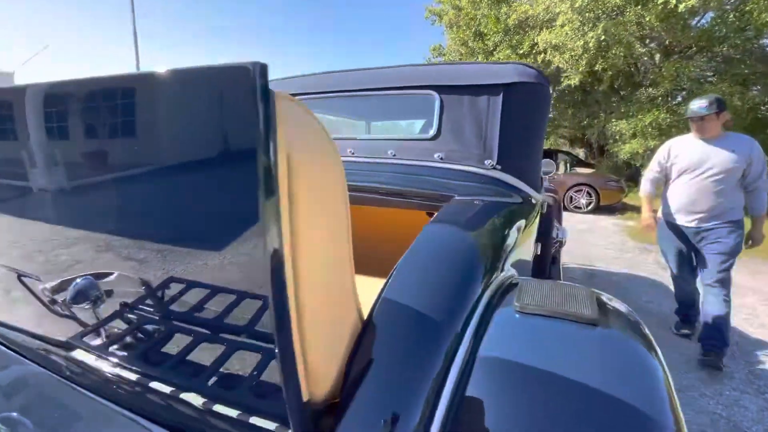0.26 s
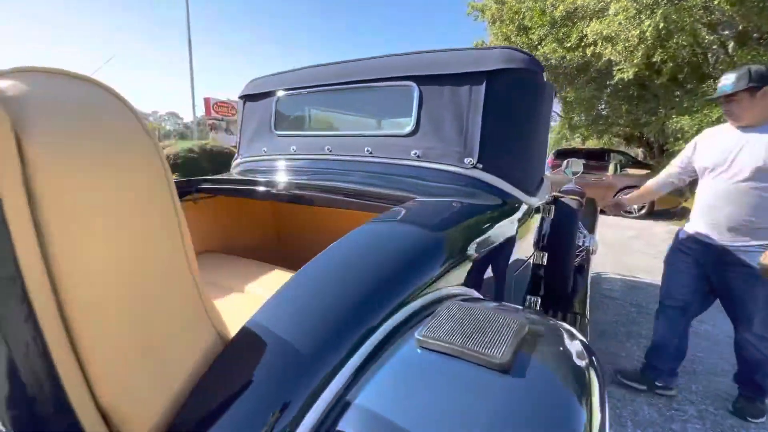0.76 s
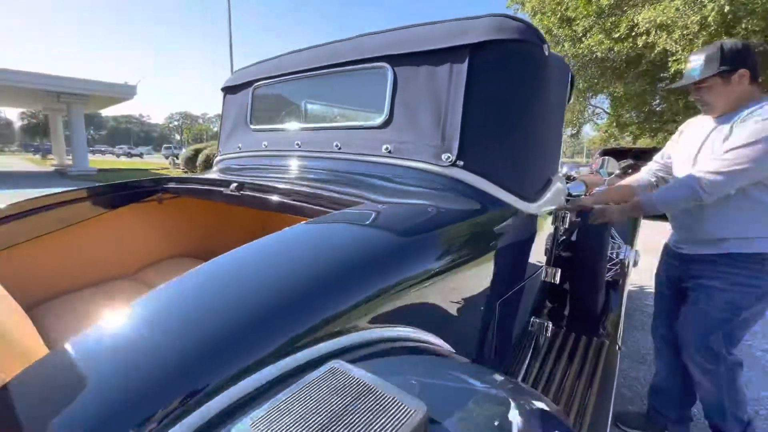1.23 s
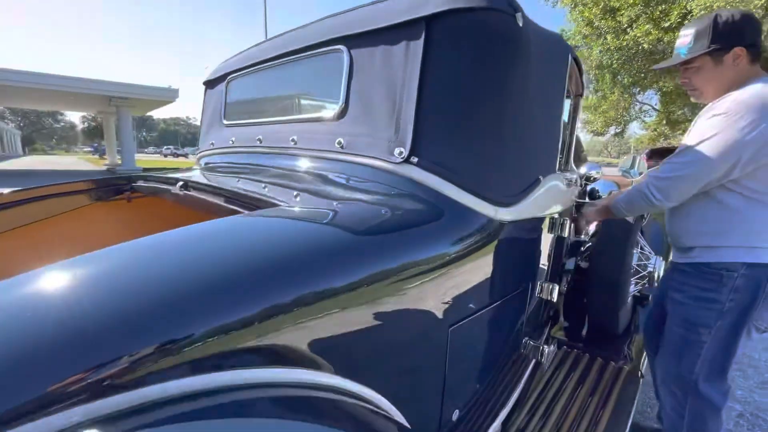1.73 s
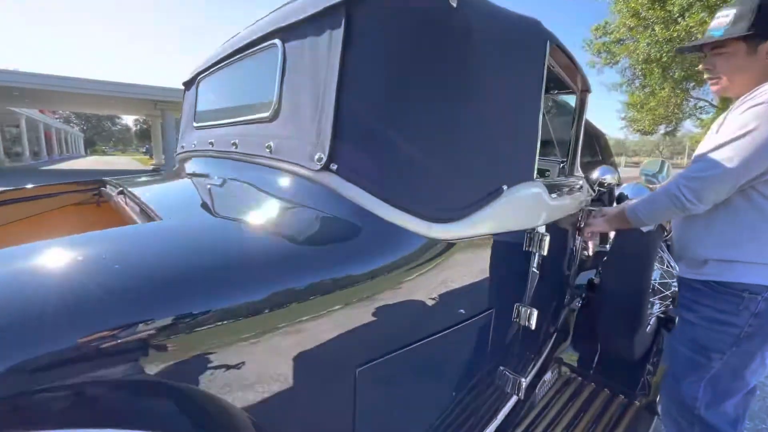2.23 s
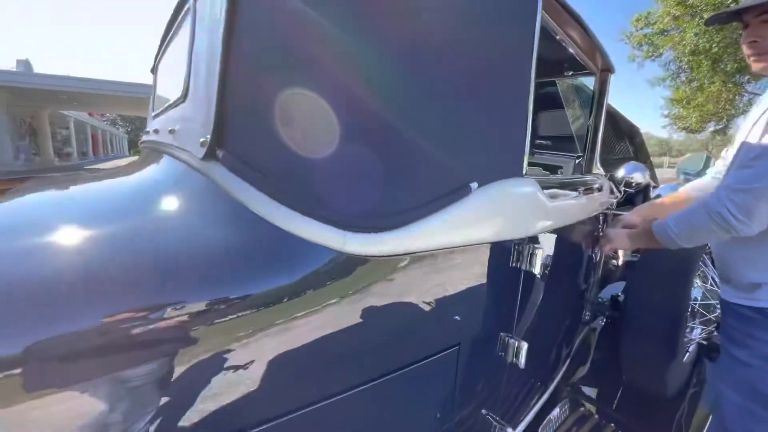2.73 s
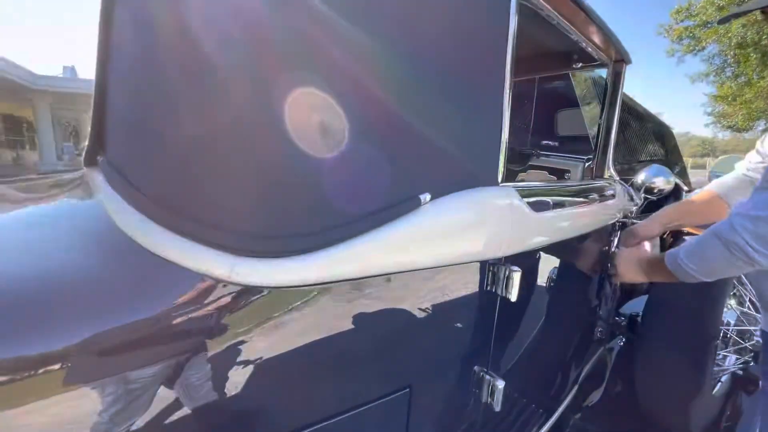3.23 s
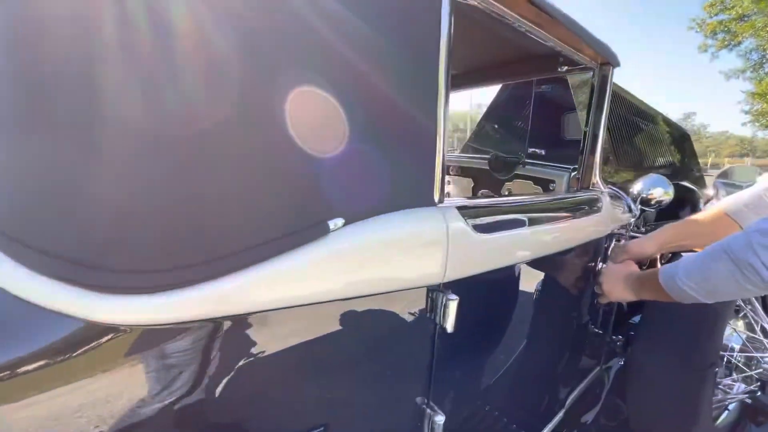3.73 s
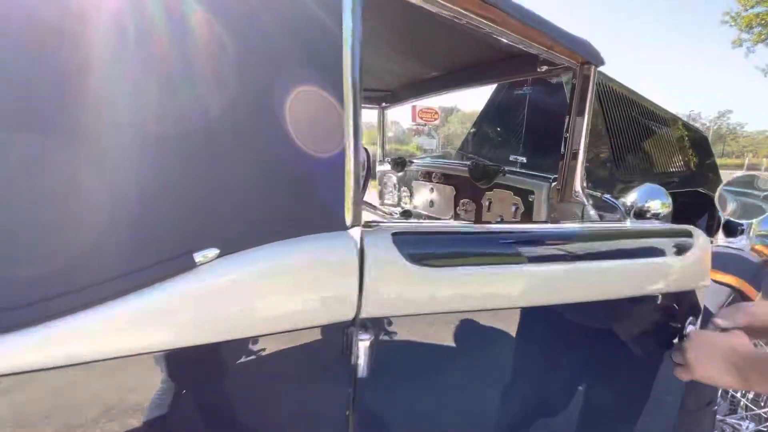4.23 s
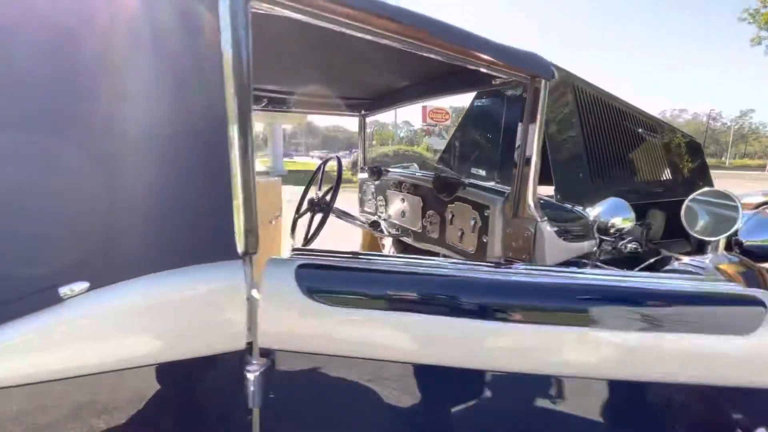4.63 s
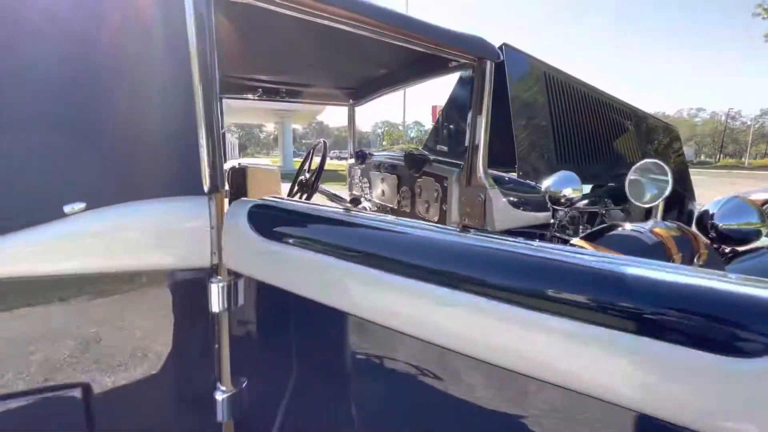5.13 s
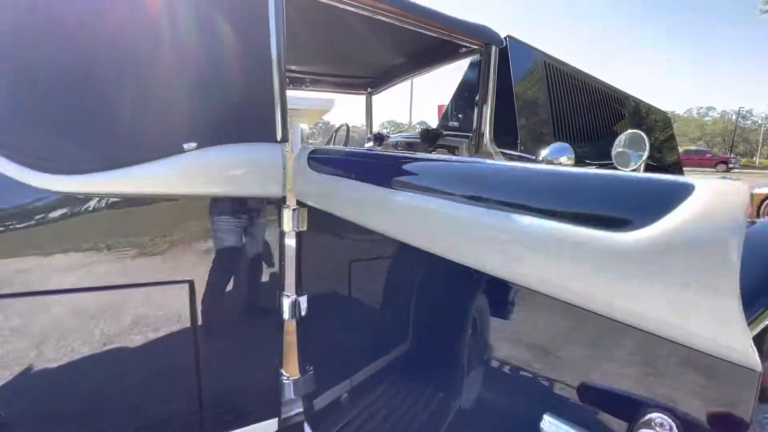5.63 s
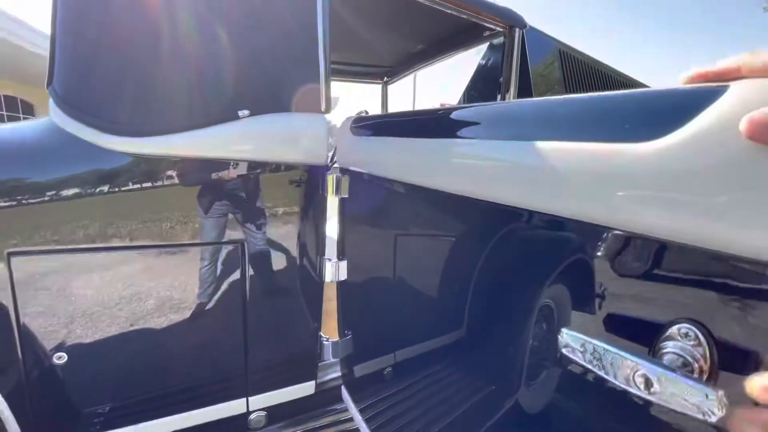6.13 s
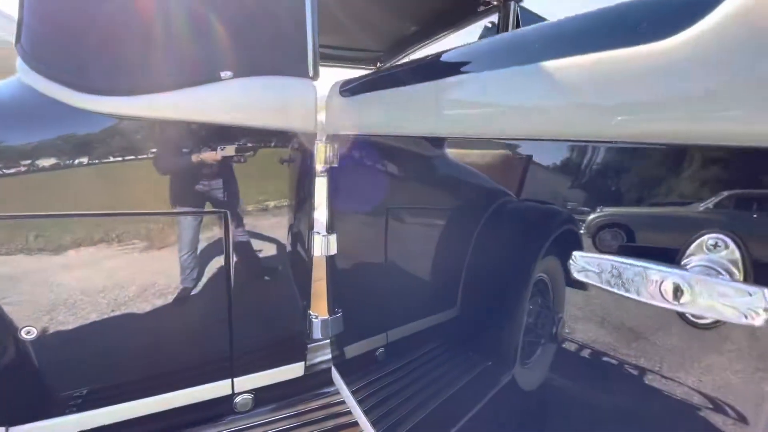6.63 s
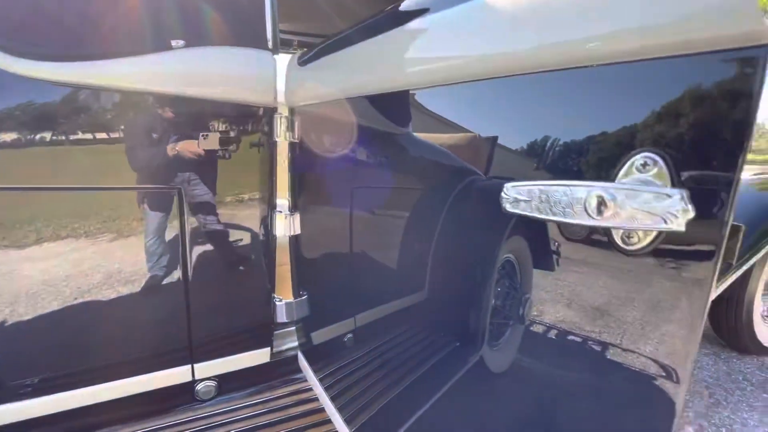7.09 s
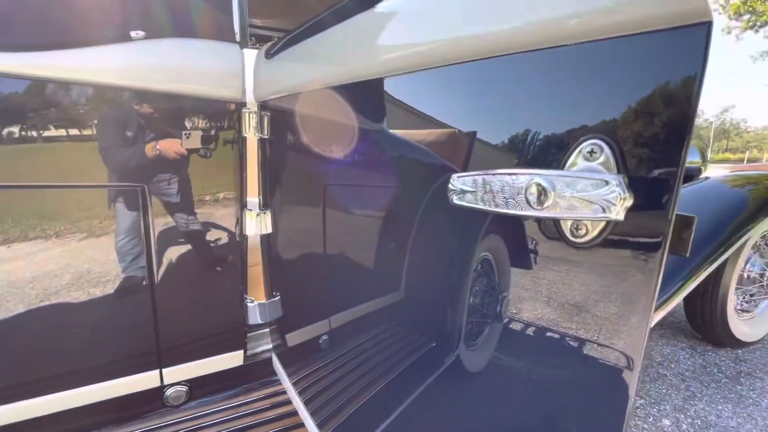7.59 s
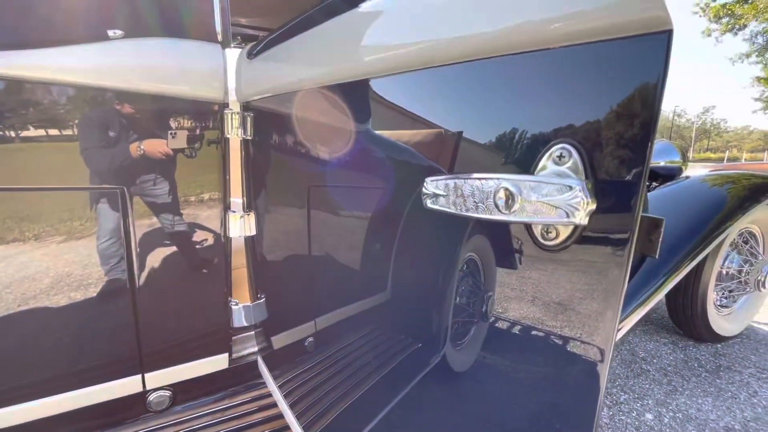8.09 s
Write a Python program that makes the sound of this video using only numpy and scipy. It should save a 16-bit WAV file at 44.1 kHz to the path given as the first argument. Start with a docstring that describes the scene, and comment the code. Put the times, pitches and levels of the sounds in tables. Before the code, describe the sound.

Low engine drones and a soft road rumble sit to the right throughout, swelling and easing. Close to the microphone, slightly left, shoes crunch and scuff on grit. At about three seconds a metal handle clacks sharply, then a cluster of latch snaps and a dull door thud. Later come a few crisp clicks, faint shuffling, and a climbing engine tone under broadening traffic roar.

```python
"""Outdoors on a gravel lot: engines drone and pull away nearby over a wash of road noise.
Each engine is a stack of sine tones tied to its speed; the road is shaped noise that swells and fades.
Close by, shoes crunch and scuff on grit (noise bursts and grains), a door handle ticks, its latch snaps
and the door thuds free (short blows ringing metal modes).
Two spaced microphone ports hear the engines from the right."""
import sys
import numpy as np
from scipy import signal
from scipy.fft import rfft, irfft
from scipy.io import wavfile

SR = 44100
rng = np.random.default_rng(int(sys.argv[2]) if len(sys.argv) > 2 else 0)


def store_wav(level_fs):
    """Save 16-bit WAV to argv[1]."""
    pcm = np.round(np.clip(np.atleast_2d(level_fs), -1, 1) * 32767)
    wavfile.write(sys.argv[1], SR, pcm.T.astype(np.int16))


N = 368235  # length in samples

# tones of the near engine over time: t/s, level of cycle order 4/dB, level of the firing order 8/dB
NEAR_TONES = [(.6, -52.5, -55), (.85, -31.5, -50), (1.65, -26, -45), (2.1, -30.5, -43), (3.3, -32, -41),
              (3.8, -57, -42), (5.05, -58, -42), (5.35, -58, -33), (6.8, -56, -29), (8.35, -55, -31)]
PORT_LAG_S = 0.00039  # the left port hears the engines and road this much later
CRACK_S = 0.0033  # time constant of the sharp start of a crunch or clack


def amp(db):
    """Turn decibels into a gain."""
    return 10 ** (np.asarray(db) / 20)


def rms_one(x):
    """Scale to unit rms."""
    return x / np.sqrt(np.mean(x ** 2) + 1e-20)


def in_time(rows):
    """Draw straight lines between the rows of a curve, giving each column sample by sample."""
    s, *columns = np.transpose(rows)
    t = np.arange(N) / SR
    return [np.interp(t, s, column) for column in columns]


def at_hz(points, hz):
    """Read a spectrum between its points on a log-frequency axis."""
    points = np.array(points)
    return np.interp(np.log(hz), np.log(points[:, 0]), points[:, 1])


def drift(rate_hz):
    """Slow random wandering of unit rms, made at a fortieth of the sample rate; higher rates wander faster."""
    r = np.exp(-80 * np.pi * rate_hz / SR)
    white = rng.standard_normal(N // 40 + 2002)
    slow = signal.lfilter([1], [1, -2 * r, r * r], white)[2000:]  # drop the filter's start
    return np.interp(np.arange(N) / 40, np.arange(len(slow)), rms_one(slow))


def coloured(x, spectrum):
    """Shape a signal by a spectrum, then scale to unit rms."""
    hz = np.maximum(np.arange(N // 2 + 1) * SR / N, 1)
    return rms_one(irfft(rfft(x) * amp(at_hz(spectrum, hz)), N))


def band(x, low_hz, high_hz):
    """Keep the range between two frequencies."""
    return signal.sosfilt(signal.butter(2, [low_hz, high_hz], "band", fs=SR, output="sos"), x)


def ports(x, lag_s):
    """Send one source to both ports, later on the left."""
    n = np.arange(N)
    left = np.interp(n - lag_s * SR, n, x)
    return np.array([left, x])


def engine(hz, lines, span, start_turn):
    """Exhaust tones (order, level over time) as sines locked to the speed, heard over the span of a curve."""
    turns, t = np.cumsum(hz) / SR + start_turn, np.arange(N) / SR
    start_s, end_s = span[0][0], span[-1][0]
    heard = np.interp(t, [start_s - .1, start_s, end_s, end_s + .2], [0, 1, 1, 0])
    tones = sum(np.sqrt(2) * amp(db) * np.sin(2 * np.pi * k * turns) for k, db in lines)
    return heard * tones


def near_engine(waver_db=1.0):
    """Eight-cylinder engine under load: two strong orders waver and stumble, minor orders swell slowly."""
    # engine speed: t/s, speed in cycles per second f/Hz
    speed = [(.6, 15.85), (1.6, 15.05), (2.4, 15.05), (3.3, 15.9), (4.5, 16.05), (8.35, 17.03)]
    # tones from uneven cylinders: cycle order, level against the shared minor level/dB
    minor_orders = [(3, -2), (6, 4), (11, -5.5), (13, -2)]
    # moments when the firing falters: t/s, change of order 4 level/dB, change of order 8 level/dB
    stumbles = [(6.5, 12, -10), (7.25, -5, -29)]
    stumble_s = 0.22  # to reach the full change, and again to recover
    minor_from_db, minor_full_db, minor_full_s = -60.5, -51.5, 2.6  # they grow as the engine takes load

    t, strong_db = np.arange(N) / SR, np.array(in_time(NEAR_TONES))
    for s, *change_db in stumbles:
        depth = np.maximum(1 - abs(t - s) / stumble_s, 0)
        strong_db = strong_db + np.outer(change_db, depth)
    minor_db = np.interp(t, [NEAR_TONES[0][0], minor_full_s], [minor_from_db, minor_full_db])
    lines = [(k, db + waver_db * drift(19)) for k, db in zip([4, 8], strong_db)]
    lines += [(k, minor_db + db + 3.9 * drift(1.8)) for k, db in minor_orders]
    return engine(in_time(speed)[0], lines, NEAR_TONES, start_turn=0.1)


def far_engine(curve, start_turn, waver_db, octave_db, octave_until_s=5.24):
    """A wavering firing tone and its octave; the octave fades out from a set time."""
    hz, level_db = in_time(curve)
    octave_db = octave_db - 20 * np.maximum(np.arange(N) / SR - octave_until_s, 0)  # 20 dB per second
    firing = (1, level_db + waver_db * drift(24))
    octave = (2, level_db + octave_db + waver_db * drift(11))
    return engine(hz, [firing, octave], curve, start_turn)


def climbing_engine():
    """Second engine, its revs mostly rising, so its firing tone climbs."""
    # firing tone: t/s, f/Hz, level/dB
    curve = [(2.7, 64.6, -47), (3.7, 67.75, -34), (4.7, 70.15, -32), (5.0, 68.43, -37), (5.4, 72.73, -34),
             (5.8, 71.8, -42.5), (6.3, 75.2, -38), (8.35, 86, -36)]
    return far_engine(curve, start_turn=0.33, waver_db=4.5, octave_db=-8)


def shifting_engine():
    """Third engine, whose firing tone falls and rises again as it drops revs through a gear change."""
    # firing tone: t/s, f/Hz, level/dB
    curve = [(0, 150, -54), (.3, 149.5, -36), (0.548, 146.5, -44.5), (1.55, 95, -37), (2.2, 101, -44),
             (2.7, 104, -57), (3.8, 112, -45)]
    return far_engine(curve, start_turn=0.065, waver_db=1.0, octave_db=-37)


def ticks(rise_s=0.0014, lag_s=.00006, alike=0.63):
    """Each crunch is a crack and a dying tail of bright and dull noise; harder ones last longer."""
    # crunches and ticks: t/s, strength level/dB, dull part against bright level/dB
    crunches = [(0.144, -45.5, -1.5), (0.168, -42.5, -8), (0.248, -35.5, -5), (0.304, -43, -3),
                (0.3252, -35, -7), (0.376, -42, -10), (0.414, -48.5, 6.5), (0.8704, -47.5, 0),
                (0.971, -39.5, -7), (1.595, -29, -16), (1.6785, -56, 13.5), (2.2227, -45.5, -29),
                (2.586, -40, -4.5), (2.717, -41.5, -10), (2.773, -43, -7), (2.823, -45.5, -6),
                (2.9655, -18.5, -34), (3.2788, -33, -13), (3.354, -39, -8), (3.4686, -39.5, -16),
                (3.5164, -40, -4), (3.618, -43.5, -13), (3.692, -40, -6), (3.7464, -20, -36),
                (3.8046, -35, -6), (4.248, -34, -30), (4.804, -40, -17), (4.832, -31.5, -17),
                (4.848, -45, -17), (4.9593, -37, -23), (5.0495, -38, -29), (5.275, -23, -8),
                (5.555, -49, -1), (5.7758, -24.5, -25), (5.788, -19.5, -30), (5.814, -24.5, -12),
                (6.0246, -38.5, -11), (6.8762, -41, -17), (7.222, -36.5, -5), (7.3434, -37, -3),
                (7.571, -47.5, 4.5), (8.1969, -55.5, 19.5)]
    tail_db = -10  # where the tail starts, against the crack
    bright, dull = np.full(N + SR, 1e-18), np.full(N + SR, 1e-18)
    t = np.arange(SR // 5) / SR
    for s, strength_db, dull_db in crunches:
        i = int(s * SR)
        t60 = 0.068 * amp(0.15 * (strength_db + 38.0))  # seconds for the tail to fall 60 dB
        fall = np.exp(-t / CRACK_S) + amp(tail_db - 60 * t / t60)
        burst = np.minimum(t / rise_s, 1) * amp(strength_db) * fall
        bright[i:i + len(t)] += burst
        dull[i:i + len(t)] += amp(dull_db) * burst
    shared = ports(rng.standard_normal(N), lag_s)
    noise = alike * shared + (1 - alike) * rng.standard_normal((2, N))
    bright_noise = rms_one(band(noise, 2900, 20000))
    dull_noise = rms_one(band(noise, 1470, 3820))
    return bright[:N] * bright_noise + dull[:N] * dull_noise


def scuffs(dull_db=-8.0, smooth_from_s=.45, shift_db=2.0):
    """Dense grit grains under each drag, with a duller rub beneath; short drags are clumpier."""
    # soles and hands dragging: start t/s, length t/s, level/dB
    drags = [(0.094, 0.29, -54), (0.23, 0.29, -52), (0.723, 0.37, -52.5), (1.59, 0.074, -54),
             (1.677, 0.072, -50.5), (3.33, 0.14, -45), (3.671, 0.2, -39.5), (4.265, 0.054, -43.5),
             (4.79, 0.068, -63), (4.955, 0.036, -44), (5.21, 0.5, -47), (5.502, 1, -59), (6.691, 0.13, -48),
             (6.803, 0.58, -55.5), (7.2, 0.091, -46), (7.254, 0.18, -46)]
    # faint steady shuffle under the drags: start t/s, end t/s, level/dB
    shuffle = (2.8, 7.74, -54.5)
    # colour of the grit: f/Hz, relative level per Hz/dB
    grit = [(2000, -46), (4500, 13), (9000, 10), (11500, 2), (16000, 15)]
    sizes = amp(2.65 * np.minimum(rng.exponential(1, (2, N)), 5)) * rng.choice([-1, 1], (2, N))
    grains = sizes * (rng.random((2, N)) < 6000 / SR)  # about 6000 grains per second
    drag, clumps = np.zeros(N), drift(60)
    for s, length_s, level_db in [*drags, (shuffle[0], shuffle[1] - shuffle[0], shuffle[2])]:
        i, n = int(s * SR), int(length_s * SR)
        clump_db = 3.0 if length_s < smooth_from_s else 1.5
        come_and_go = signal.windows.tukey(n, min(0.55 + length_s / 0.65, 1))
        drag[i:i + n] += amp(level_db + clump_db * clumps[i:i + n]) * come_and_go
    gritty = amp(shift_db * drift(15)) * coloured(grains, grit)
    rub = amp(dull_db + shift_db * drift(2.7)) * rms_one(band(grains, 800, 3320))
    return drag * (gritty + rub)


def close_by(x):
    """Near sounds lean left, less so at the handle; the highest part is alike in both ports."""
    # hands on the handle, in front of the ports: start t/s, end t/s
    handling = (2.6, 4.35)
    t, top_hz = np.arange(N) / SR, 10600
    at_handle = (t > handling[0]) & (t < handling[1])
    left_db = np.where(at_handle, 2, 7)  # left port against right
    top_db = np.where(at_handle, 0, -7.5)  # brighter at the handle
    top = band(x[1], top_hz, 19500)
    body = signal.sosfilt(signal.butter(4, top_hz, fs=SR, output="sos"), x)
    return amp([left_db / 2, -left_db / 2]) * body + amp(top_db) * top


def ring(blows, modes, t60, spread_db, rattle_s, narrow):
    """Blows rattle briefly against every mode; a soft blow reaches only the modes near its own pitch."""
    at, out = (blows[:, 0] * SR).astype(int), np.zeros(N)
    chance = rng.standard_normal((len(at), len(modes)))
    r_contact, rattle = np.exp(-1 / (rattle_s * SR)), rng.standard_normal(N)
    softness_db = blows[:, 1] - blows[:, 1].max()
    for k, (hz, level_db) in enumerate(modes):
        clicks = np.full(N, 1e-18)
        reach_db = narrow * softness_db * abs(np.log2(hz / blows[:, 2]))
        clicks[at] = amp(blows[:, 1] + level_db + reach_db + spread_db * chance[:, k])
        press = np.sqrt(1 - r_contact ** 2) * signal.lfilter([1], [1, -r_contact], clicks)
        contact = press * np.roll(rattle, k * SR // 3)  # other noise for each mode
        w = 2 * np.pi * hz / SR
        r = amp(-60 / (t60 * SR) * np.sqrt(hz / modes[0][0]))  # higher modes die sooner
        out += signal.lfilter([0, np.sin(w)], [1, -2 * r * np.cos(w), r * r], contact)
    return out


def door(clack_db=-14):
    """Latch blows clack and ring the damped skin, its modes mixed differently per port; the seal thuds."""
    # dull knocks, mostly latch and handle: t/s, strike level/dB, pitch of the modes struck hardest f/Hz
    knock_rows = [(0.327, -30.5, 1660), (0.639, -38, 1410), (0.822, -28.5, 1300), (2.968, -14, 1280),
                  (3.709, -23.5, 1500), (3.729, -25, 910), (3.744, -20.5, 1840), (3.782, -28, 1190),
                  (3.803, -26.5, 1870), (3.992, -30.5, 1346), (5.277, -25, 910), (5.297, -28, 1890),
                  (5.335, -26.5, 1390), (5.72, -26, 1290), (6.164, -31.5, 1900), (6.306, -29, 1460)]
    # modes of the door skin: f/Hz, relative level/dB
    skin_modes = [(430, -4.5), (690, 0.5), (875, -1), (1190, -2.5), (1390, -5), (1620, -5.5), (1940, -8.5),
                  (2260, -7), (3420, -4.5), (5950, -4)]
    # door leaving its seal: t/s, strike level/dB, pitch of the modes struck hardest f/Hz
    seal_thuds = [(3.716, -26.5, 230), (3.794, -27, 370)]
    # modes of the door panel: f/Hz, relative level/dB
    panel_modes = [(185, 6), (270, 0.5), (370, 5), (480, 0)]
    bounce_s, bounce_db = 0.014, -6.5  # each knock bounces once; this level is for the hardest

    knocks = np.array(knock_rows)
    softness_db = knocks[:, 1] - knocks[:, 1].max()
    bounces = knocks + [bounce_s, bounce_db, 0] + np.outer(softness_db, [0, 1, 0])  # soft ones hardly bounce
    blows = np.vstack([knocks, bounces])
    skin = [ring(blows, skin_modes, t60=0.055, spread_db=2.0, rattle_s=.0035, narrow=0.55)
            for port in range(2)]
    touch = np.full(N, 1e-18)
    touch[(blows[:, 0] * SR).astype(int)] = amp(blows[:, 1] + clack_db)
    clack_level = signal.lfilter([1], [1, -np.exp(-1 / (CRACK_S * SR))], touch)
    clack = clack_level * rms_one(band(rng.standard_normal((2, N)), 490, 6900))
    panel = ring(np.array(seal_thuds), panel_modes, t60=0.065, spread_db=-4.5, rattle_s=0.042, narrow=0.33)
    return np.array(skin) + clack + ports(panel, PORT_LAG_S)


def wash(spectrum, level_db, patchy_db):
    """Shaped noise: a part from the right plus a diffuse part of its own at each port."""
    # part of the wash arriving from all around: f/Hz, share of power from 0 to 1
    diffuse = [(60, 0.17), (300, 0.44), (1000, 0.47), (4000, 0.95)]
    white, hz = rng.standard_normal((3, N)), np.maximum(np.arange(N // 2 + 1) * SR / N, 1)
    share = np.clip(at_hz(diffuse, hz), 0, 1)
    from_right = np.sqrt(1 - share) * rfft(ports(white[0], PORT_LAG_S))
    all_around = np.sqrt(share) * rfft(white[1:])
    noise = rms_one(irfft((from_right + all_around) * amp(at_hz(spectrum, hz)), N))
    return amp(level_db + patchy_db * drift(2.44)) * noise


def road_noise():
    """Four washes of noise: a rumble, a low roar, a tyre drone and a broad roar, each with its own level."""
    # levels over time: t/s, low roar level/dB, tyre drone level/dB
    road_levels = [(.8, -47.5, -62), (2.0, -50.5, -50), (4.6, -53, -42), (5.5, -42, -40.5),
                   (6.5, -44, -52.5), (8.35, -38.5, -49)]
    # four spectra, each: f/Hz, relative level per Hz/dB
    rumble = [(25, -61), (58, 3.5), (86, 0), (127, 2), (172, -9.5), (260, -22), (340, -61.5)]
    low_roar = [(110, -21), (170, 2), (250, 3), (330, -2), (480, -38), (1000, -98)]
    tyre_drone = [(330, -6), (480, -0.5), (640, -8.5), (790, 0), (950, -16), (2000, -87)]
    broad_roar = [(220, -7), (400, -2), (900, -3), (1400, -7), (2300, -23), (3700, -28), (9300, -36),
                  (10800, -59)]
    t, (low_roar_db, drone_db) = np.arange(N) / SR, in_time(road_levels)
    # the rumble steps up in 0.23 s as the near engine comes in
    rumble_db = np.interp(t - NEAR_TONES[0][0], [0, 0.23], [-40.5, -37.5])
    broad_roar_db = -46 + 0.4629 * t  # grows steadily, in dB per second
    return (wash(rumble, rumble_db, patchy_db=2.0) + wash(low_roar, low_roar_db, patchy_db=1.5)
            + wash(tyre_drone, drone_db, patchy_db=1.0) + wash(broad_roar, broad_roar_db, patchy_db=1.0))


def airy_hiss():
    """A faint airy hiss around 2-3 kHz: band-passed noise, separate at each port."""
    # hiss over time: t/s, level/dB
    air = [(0, -58.5), (2, -68), (6, -68), (8.35, -55.5)]
    hiss = band(band(rng.standard_normal((2, N)), 1730, 2760), 1500, 4200)
    return amp(in_time(air)[0]) * rms_one(hiss)


def scene():
    """Engines and road from the right, steps and door close by."""
    engines = near_engine() + climbing_engine() + shifting_engine()
    steps = close_by(scuffs() + ticks())
    return ports(engines, PORT_LAG_S) + steps + door() + road_noise() + airy_hiss()


def record(dry):
    """Tone colour: a dip near 10 kHz, a peak just above, little above 13 kHz, nothing above 16 kHz."""
    dipped = dry - .85 * signal.lfilter(*signal.iirpeak(10000, 9.0, fs=SR), dry)
    peaked = dipped + 1.5 * signal.lfilter(*signal.iirpeak(11400, 8.0, fs=SR), dipped)
    below = signal.sosfilt(signal.cheby2(10, 50, 13000, fs=SR, output="sos"), peaked)
    softened = amp(-36.5) * peaked + below  # a little of the highs stays
    return signal.sosfilt(signal.cheby2(12, 70, 16000, fs=SR, output="sos"), softened)


dry = scene()
out = record(dry)
store_wav(out)
```